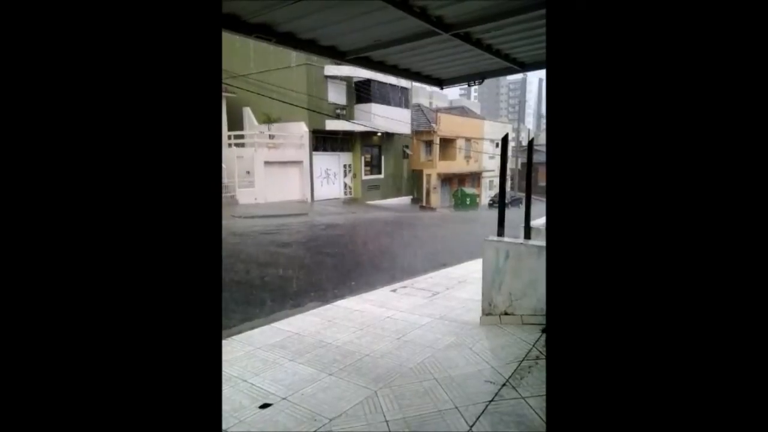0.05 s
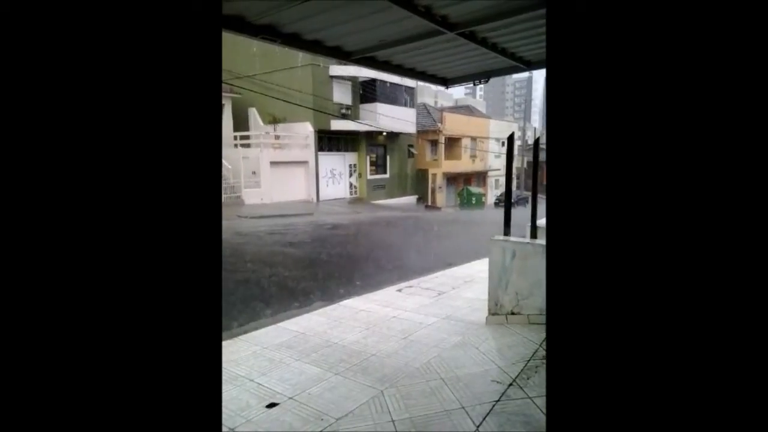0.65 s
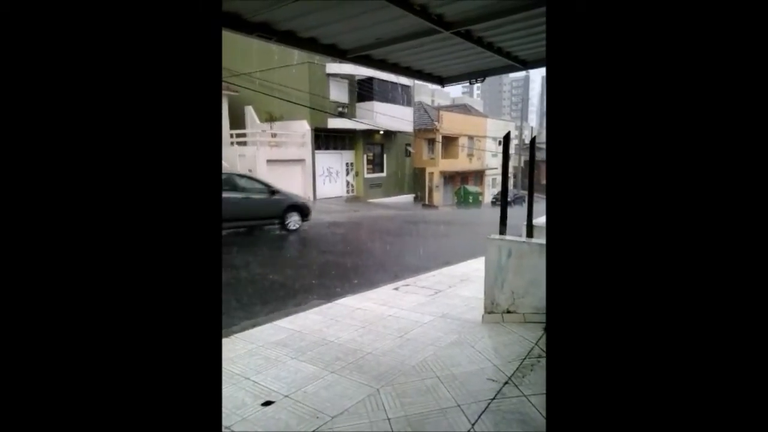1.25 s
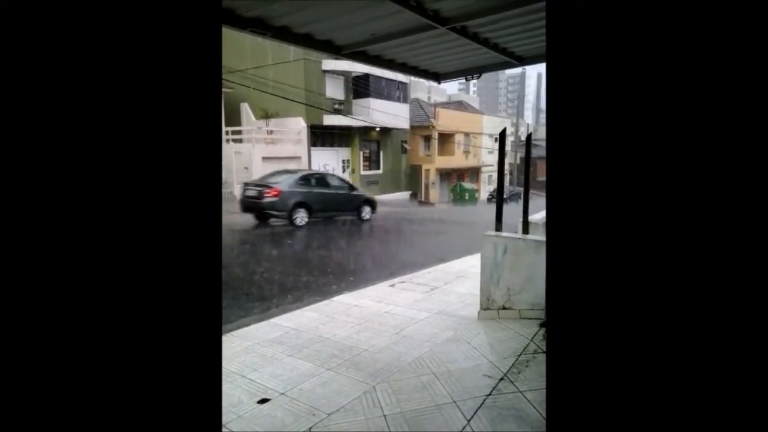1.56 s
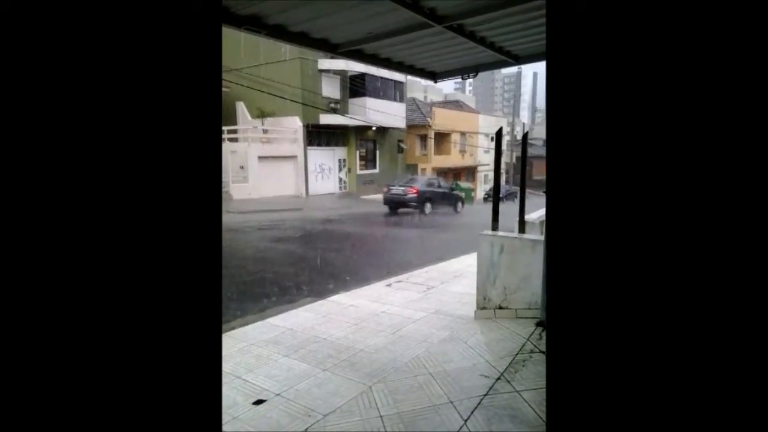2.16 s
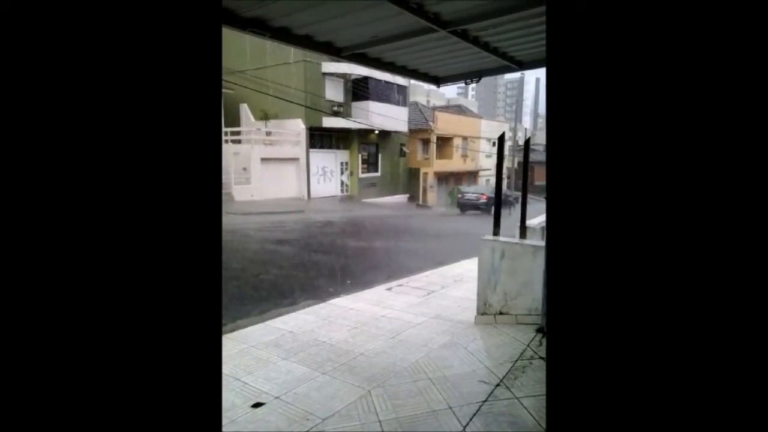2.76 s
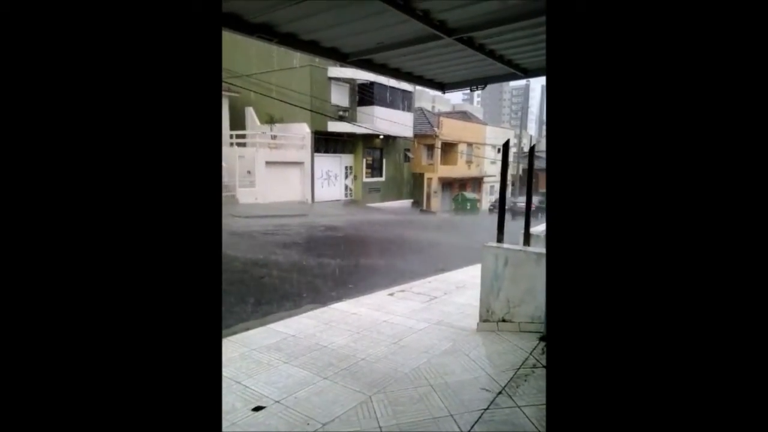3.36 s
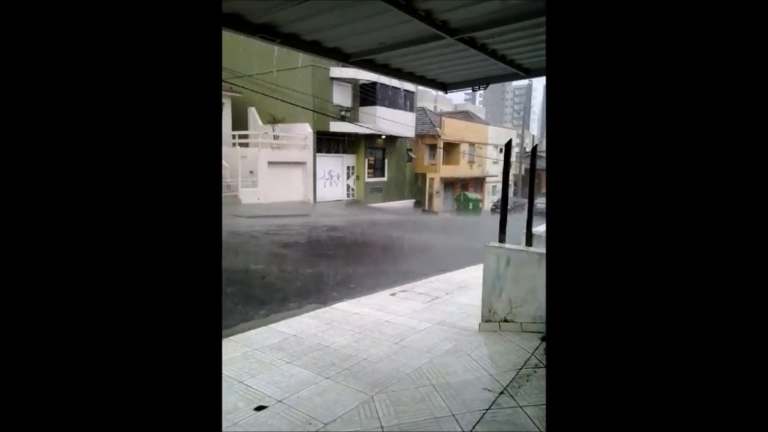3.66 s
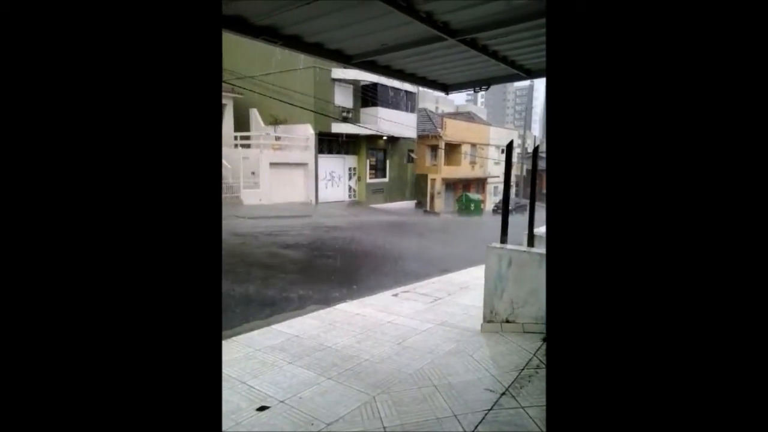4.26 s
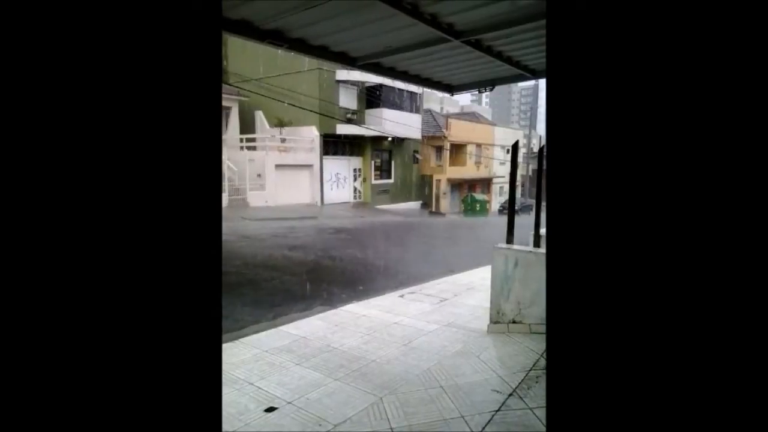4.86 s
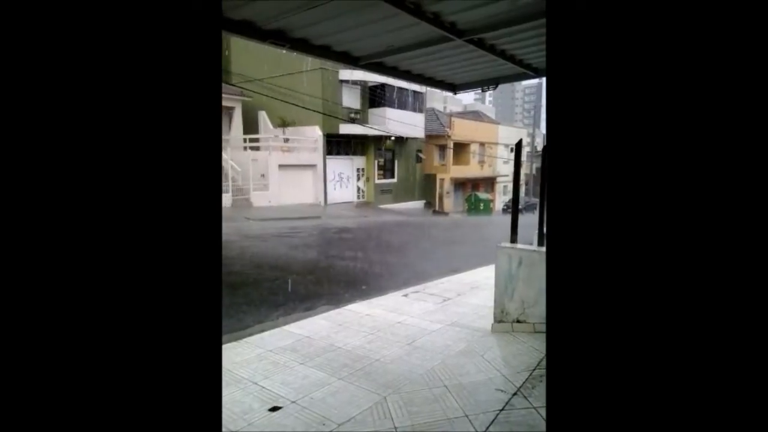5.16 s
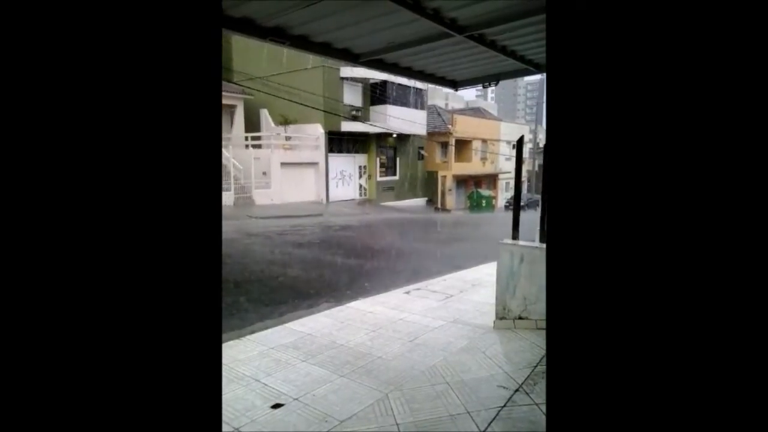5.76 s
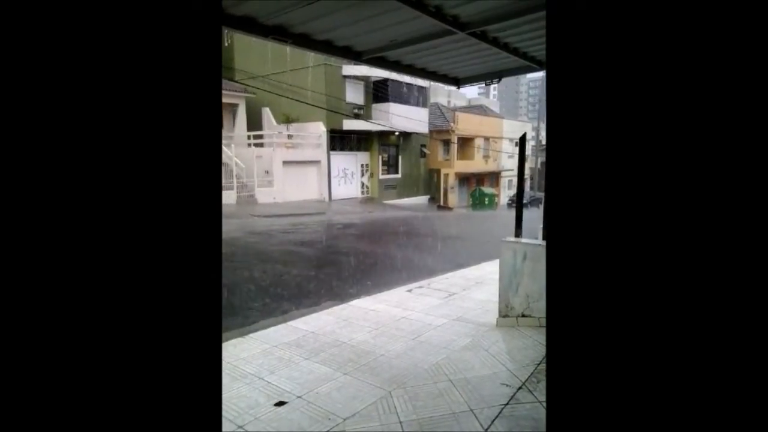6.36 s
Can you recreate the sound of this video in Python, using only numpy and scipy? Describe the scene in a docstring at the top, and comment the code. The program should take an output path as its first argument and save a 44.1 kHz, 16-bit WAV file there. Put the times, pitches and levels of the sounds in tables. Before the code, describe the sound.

Heavy rain pours on a town street for the whole six and a half seconds, heard from under a porch roof. Distant drops merge into a steady wash, nearer ones patter crisply on the pavement, and the roof drums faintly overhead. Fat drips from the eaves land a step away in sharp, irregular splats and plops, several each second.

A car is already approaching at the start and passes closest at about 1.4 seconds, its tyres hissing and swishing through the water over a soft road roar. Its low engine rumble peaks just before 2 seconds. The car recedes and is muffled after about 3 seconds, with one more distant puddle swish near 3.7 seconds.

The near rain eases very slightly but stays heavy. Three drips make tiny high plinks in a puddle at about 4.2, 4.7 and 5.9 seconds.

```python
"""Heavy rain on a street, heard in mono from under a porch roof.
From the start, far drops merge into a wash, the roof drums and nearer drops patter on the pavement,
while fat drips splat from the eaves. A car, its tyres hissing on the wet asphalt, passes at 1.35 s
and slips behind the porch wall after about three seconds. Late on, as the near rain slowly eases,
three drips trap bubbles in a puddle and ping."""
import sys
import numpy as np
from scipy import signal
from scipy.fft import rfft, irfft
from scipy.io import wavfile
from scipy.ndimage import uniform_filter1d, map_coordinates

SR = 44100
rng = np.random.default_rng(int(sys.argv[2]) if len(sys.argv) > 2 else 0)


def unload_wav(signal):
    """Save mono or channel-first audio to the path in sys.argv[1] as 16-bit WAV at rate SR, clipped to [-1, 1]."""
    wavfile.write(
        sys.argv[1],
        SR,
        np.round(np.clip(np.atleast_2d(signal).T, -1, 1) * 32767).astype(np.int16),
    )


N = 282240
TIME = np.arange(N) / SR

# lulls (negative) and flurries (positive) in the near rain: t/s, half-width/s, level change/dB
LULLS_AND_FLURRIES = [(0.45, 0.17, 2.3), (2.48, .12, 0.9), (3.18, .07, -1), (3.485, 0.024, -8.5),
                      (3.548, .04, 4), (4.075, 0.03, -5), (4.85, 0.22, -1.6), (5.5, 0.084, 2),
                      (5.67, 0.037, -4), (5.753, .04, 2), (6.181, 0.03, -2.5), (6.286, 0.076, 2)]
# tone of the far rain and town: f/Hz, level/dB
WASH_EQ = [(25, -36), (55, -30), (80, -45), (115, -19.5), (200, -14), (450, -7), (900, -7.5), (1600, -5),
           (2500, 1.5), (3700, -7.5), (8150, -5), (9600, -15), (12300, -10.5), (15800, -17.5)]
# low modes of the roof sheets: f/Hz, bandwidth/Hz, level/dB
ROOF_MODES = [(108, 7.6, -8), (135, 8, -27), (154.7, 8.7, 1.5), (197, 10, -17), (210.3, 12, 2),
              (245, 19, 3), (593, 22, 3)]
# bright tone of nearby drops, with ringing peaks near 8 and 12 kHz: f/Hz, level/dB
NEAR_DROP_EQ = [(60, -42), (1200, -13.5), (1900, -6), (2550, -4), (3400, 1.5), (4600, 0.5), (5900, 2),
                (6900, -1.5), (8150, 5), (9300, -7), (10900, -10), (12300, -1.5), (13600, -7), (15800, -18)]
# tone of churned water: f/Hz, level/dB
WATER_EQ = [(100, -50.5), (900, -33), (1500, -13), (1950, -6.5), (2300, -1.5), (2600, -0.5), (3100, -6.5),
            (3800, -13.5), (6000, -22.5), (12000, -64)]
# tone of tread on asphalt: f/Hz, level/dB
TREAD_EQ = [(50, -56), (150, -25), (400, -9.5), (560, -3), (750, -3.5), (1000, -0.5), (1500, -0.5),
            (2200, -6.5), (4000, -27.5)]
# tone of the engine through the car body: f/Hz, level/dB
ENGINE_EQ = [(40, -50), (100, -13), (180, -14.5), (250, 2.5), (310, 3), (390, -8), (800, -23.5)]
# puddles that swish under the tyres: t/s, half-width/s, boost/dB, pitch dip/fraction
PUDDLE_SWISHES = [(0.72, .16, 0, -.04), (1.218, .06, 1, .065), (2.099, .1, 1.5, 0.029), (2.3, .1, 3, 0),
                  (2.72, 0.14, 1.9, 0), (3.02, .11, 3, -.02), (3.65, .14, 6.5, -.03),
                  (4.25, .25, 2, 0.00074)]
# fat drips from the eaves: t/s, level/dB, slap f/Hz, plop level/dB, spray offset/dB
EAVES_DRIPS = [(0.069, -9, 3400, -3, -5), (0.123, -14, 4500, -3, -9), (0.3192, 1, 6440, -14, -3),
               (0.3586, -5, 8030, -25, -11), (0.4533, -1, 3720, -17, -2), (0.5453, -3, 6010, -9, -13),
               (0.5755, -12, 4510, -2, -9), (0.7891, -1, 7290, -12, -5), (0.9303, -3, 5230, -9, 1),
               (1.5032, -1, 4170, -13, -12), (1.5623, -0.5, 4280, -18, -3), (1.7574, -1, 8150, -17, -3),
               (1.7974, -5, 5490, -9, 1), (1.8756, -4, 3980, -17, -15), (2.237, -7, 5000, -6, 2),
               (2.5316, 1, 7160, -15, -14), (2.9373, -4, 6320, -17, -6), (3.0126, 0, 4200, 1.5, 2),
               (3.1789, -2, 8100, -14, -13), (3.265, -2, 3900, 0.5, 0), (3.3095, -2.5, 6000, -17, -12),
               (3.4495, 0.5, 5500, -22, -14), (3.624, -3, 7870, -15, 0.5), (3.6677, -6, 5230, -3, -9),
               (3.9289, 1, 5790, -5.5, -9), (3.9349, 0, 4670, -18, -14), (3.9809, -4, 3630, -20, -1),
               (3.986, -2.5, 5250, -17, -1), (4.13, -11, 5500, -8, 3), (4.1913, 0, 6650, -12, -0.5),
               (4.2283, -2, 6080, -12, -16), (4.4076, -6.5, 7900, -10, 3), (4.5284, -0.5, 3910, -9, -3),
               (4.573, -4, 3620, -14, -10), (4.6084, -5.5, 7950, -9, -3), (4.6736, -1, 6070, -5, -7),
               (4.752, -7, 4650, -3, 0), (4.8318, -5, 5440, -5, -3), (5.033, 0, 8170, -18, -12),
               (5.054, -1, 6470, -22, -9), (5.1672, -2.5, 6050, -24, -7), (5.313, -3, 4850, -16, 1),
               (5.4543, -1, 4660, -14, 1), (5.4859, 1, 8010, -19, -12), (5.9443, 0.5, 7000, -21, -0.5),
               (6.038, -14, 7780, -2.5, -9), (6.0969, 0.5, 5290, -9, -9), (6.244, -14, 6120, -1.5, -9),
               (6.293, 2, 8330, -24, -11), (6.3719, -1.5, 6000, -14, -2)]
# small hard drops close by: t/s, level/dB
HARD_DROPS = [(0.62, -5), (1.0126, -8), (1.3663, 0), (1.7569, -5), (1.8093, -7), (1.8262, -2), (2.1221, -2),
              (2.3734, -5), (2.547, -2), (4.13, -8), (4.2283, -5), (4.412, -7), (4.7336, -6), (5.2046, -6),
              (5.716, -3), (6.29, -7)]
# soft low rumbles: t/s, half-width/s, level/dB
LOW_SWELLS = [(1.25, 0.27, -53), (5.8, .15, -53.5)]
# drips that trap a bubble in a puddle: t/s, level/dB, starting f/Hz
BUBBLES = [(4.2105, -8, 6500), (4.675, -8, 6050), (5.9475, -6, 5850)]


def undb(db):
    """Decibels to gain."""
    return 10 ** (np.asarray(db) / 20)


def unit(x):
    """Scale to rms 1."""
    return x / np.sqrt(np.mean(x ** 2))


def colour(x, points, size=4096):
    """Minimum-phase EQ through (f/Hz, level/dB) points, so clicks keep their sharp attack."""
    hz, db = np.transpose(points)
    bins = np.maximum(np.arange(size // 2 + 1) * SR / size, 1)
    curve_db = np.interp(np.log(bins), np.log(hz), db)
    cepstrum = irfft(np.log(undb(curve_db)))
    cepstrum[1:size // 2] *= 2
    cepstrum[size // 2 + 1:] = 0
    return signal.fftconvolve(x, irfft(np.exp(rfft(cepstrum))))[:len(x)]


def walk(rate):
    """Smooth random modulation of rms 1, with `rate` new values a second."""
    hold = int(SR / rate)
    steps = np.repeat(rng.standard_normal(N // hold + 1), hold)
    return unit(uniform_filter1d(uniform_filter1d(steps, hold), hold)[:N])


def bump(s, half_width_s):
    """A bell-shaped envelope of height 1 around time s."""
    return np.exp(-((TIME - s) / half_width_s) ** 2)


def add(out, s, sound):
    """Mix a sound in at time s."""
    i = int(np.clip(s * SR, 0, N - 1))
    out[i:i + len(sound)] += sound[:N - i]


def impacts(rate, spread_db):
    """Random clicks, about `rate` a second; drop size and distance scatter their strength."""
    chance, size = rng.random(N), np.clip(rng.standard_normal(N), -2, 2)
    return (chance < rate / SR) * undb(spread_db * size) * rng.choice([-1, 1], N)


def splat(hz, spray_db, cycles, spray_s, droplet_db, flatten_s=0.0015):
    """One drop in two layers: a short slap as it flattens, and a dying tail of thrown droplets."""
    t = np.arange(SR // 25) / SR - flatten_s
    slap = np.exp(-(t * hz / cycles) ** 2) * np.sin(2 * np.pi * (hz * t + rng.random()))
    grain, size = rng.standard_normal((2, len(t)))
    crackle = unit(grain * undb(droplet_db * np.clip(size, -2, 2)))
    droplets = crackle * np.exp(-t / spray_s) * (t > 0)
    return slap, undb(spray_db) * droplets / 2


def shower(start_db=-17.5, ease_db_per_s=0.33, waver_db=-0.45):
    """The near rain's fader in dB: a slow easing, a slight waver, brief lulls and flurries."""
    changes_db = sum(db * bump(s, width) for s, width, db in LULLS_AND_FLURRIES)
    return start_db - ease_db_per_s * TIME + waver_db * walk(rate=6) + changes_db


def wash(shower_db, level_db=-20, follow=0.25):
    """Countless far drops merge into a smooth bed that partly follows the shower."""
    bed = unit(colour(rng.standard_normal(N), WASH_EQ))
    return bed * undb(level_db + follow * (shower_db - shower_db.mean()))


def roof(level_db=-43):
    """Rain keeps the low modes of the roof sheets ringing."""
    blows = impacts(rate=900, spread_db=3)
    ring = sum(undb(db) * signal.lfilter(*signal.iirpeak(hz, hz / width, fs=SR), blows)
               for hz, width, db in ROOF_MODES)
    return unit(ring) * undb(level_db)


def patter(trim_db=-4, flurry_db=2):
    """Small drops tick on the pavement in quick flurries."""
    drops = colour(impacts(rate=2000, spread_db=3), NEAR_DROP_EQ)
    return unit(drops) * undb(trim_db + flurry_db * walk(rate=45))


def splashes(count=800, trim_db=-8, spread_db=3.5, low_hz=2200, high_hz=13500):
    """Larger drops burst nearby, each at its own pitch."""
    out = np.zeros(N)
    times, pitches = rng.uniform(0, N / SR, count), rng.uniform(low_hz, high_hz, count)
    sizes = np.clip(rng.standard_normal(count), -2, 1.2)
    for s, hz, size in zip(times, pitches, sizes):
        slap, spray = splat(hz, spray_db=-9, cycles=1.3, spray_s=0.008, droplet_db=6)
        # a briefer slap packs the same energy into a higher peak
        add(out, s, undb(spread_db * size) * (slap * np.sqrt(hz / high_hz) + spray))
    return unit(colour(out, NEAR_DROP_EQ)) * undb(trim_db)


def spatter(trim_db=-14):
    """Stray drops blown under the roof click crisply on the floor."""
    return unit(colour(impacts(rate=28, spread_db=2.5), NEAR_DROP_EQ)) * undb(trim_db)


def plops(trim_db=-11.5):
    """Drops land in puddles further off with dull, uneven plops."""
    return unit(colour(impacts(rate=80, spread_db=5.5), WATER_EQ)) * undb(trim_db)


def tyre_hiss(nearness, behind, doppler, hidden, base_db=-17.5, wall_db=-5, flutter_db=0.8):
    """Tyres tear through the water film in a gritty hiss and swish through each puddle."""
    puddle_db = sum(db * bump(s, width) for s, width, db, _ in PUDDLE_SWISHES)
    pitch_dip = sum(dip * bump(s, width) for s, width, _, dip in PUDDLE_SWISHES)
    grit = unit(colour(impacts(rate=5000, spread_db=3), WATER_EQ))
    # varispeed slides the tone: lower with the car abreast, higher when it is far
    speed = doppler * (0.97 + 0.05 * np.abs(behind) - pitch_dip)
    hiss = map_coordinates(grit, [np.cumsum(speed)], order=3, mode="mirror")
    fader_db = base_db + puddle_db + wall_db * hidden + flutter_db * walk(rate=40)
    return hiss * nearness ** 0.52 * undb(fader_db)


def road_roar(nearness, behind, hidden, base_db=-26.5, rear_db=1.4, wall_db=-1.5):
    """Tread roars on the asphalt, louder behind the car than ahead of it."""
    roar = unit(colour(rng.standard_normal(N), TREAD_EQ))
    return roar * nearness ** 0.79 * undb(base_db + rear_db * behind + wall_db * hidden)


def engine(nearness, behind, passes_s, base_db=-36.5, body_db=-7, rear_db=4, beam_db=-0.3, lag_s=0.53):
    """Engine rumble; the exhaust points backwards, so it peaks after the car has passed."""
    all_round = undb(body_db + rear_db * behind) * np.sqrt(nearness)
    exhaust_beam = undb(beam_db) * bump(passes_s + lag_s, half_width_s=0.72)
    rumble = unit(colour(rng.standard_normal(N), ENGINE_EQ))
    return rumble * undb(base_db) * (all_round + exhaust_beam) * np.sqrt(nearness)


def car(speed_m_s=7, passes_s=1.35, closest_m=9, hidden_s=3.12, hiding_s=0.056):
    """A wet pass-by: house fronts slow the fade, and the porch wall ducks the hiss and roar."""
    along_m = speed_m_s * (TIME - passes_s)
    distance_m = np.hypot(along_m, closest_m)
    nearness = closest_m / distance_m
    behind = along_m / distance_m  # -1 approaching, 0 abreast, +1 leaving
    doppler = 1 / (1 + speed_m_s * behind / 343)
    hidden = (1 + np.tanh((TIME - hidden_s) / hiding_s)) / 2
    tyres = tyre_hiss(nearness, behind, doppler, hidden) + road_roar(nearness, behind, hidden)
    return tyres + engine(nearness, behind, passes_s)


def drips(slap_trim_db=-1.8, plop_trim_db=-1, fragment_trim_db=-8, plop_hz=2650, cycles=1.7):
    """Fat drips from the eaves land a step away: a bright slap, a lower plop, spray and a short slosh."""
    slaps, sprays, sloshes = np.zeros((3, N))
    for s, db, hz, plop_db, spray_db in EAVES_DRIPS:
        slap, spray = splat(hz, spray_db, cycles, spray_s=0.0053, droplet_db=0.5)
        detuned_hz = plop_hz * rng.uniform(1, 1.07)
        plop, slosh = splat(detuned_hz, spray_db=3, cycles=cycles, spray_s=0.029, droplet_db=-3)
        plop_gain = undb(plop_db + plop_trim_db)
        add(slaps, s, undb(db + slap_trim_db) * slap + plop_gain * plop)
        # the drip breaks up as it falls; fragments land just before and after, each at its own pitch
        for late, detune in rng.random((4, 2)):
            fragment_hz = np.sqrt(hz * (3000 + 6000 * detune))
            fragment, _ = splat(fragment_hz, spray_db, cycles, spray_s=0.009, droplet_db=6)
            add(slaps, s - 0.006 + 0.018 * late, undb(db + fragment_trim_db) * fragment)
        add(sprays, s, undb(db) * spray)
        add(sloshes, s, plop_gain * slosh)
    return slaps + colour(sprays, NEAR_DROP_EQ) + colour(sloshes, WATER_EQ)


def dribble(count=34, base_db=-7.5, scatter_db=3, low_hz=3500, high_hz=8400):
    """Lesser drips fall all along the eaves in a loosely even rhythm."""
    slaps, sprays = np.zeros((2, N))
    for k, (when, pitch, size) in enumerate(rng.random((count, 3))):
        hz = low_hz + (high_hz - low_hz) * pitch
        slap, spray = splat(hz, spray_db=-7, cycles=1.4, spray_s=0.008, droplet_db=-3)
        s = (k + when) / count * N / SR
        gain = undb(base_db + scatter_db * (2 * size - 0.5))
        add(slaps, s, gain * slap)
        add(sprays, s, gain * spray)
    return slaps + colour(sprays, NEAR_DROP_EQ)


def ticks(hz=12350, trim_db=-1):
    """Small hard drops strike nearby, all with the same thin, high tick."""
    out = np.zeros(N)
    for s, db in HARD_DROPS:
        slap, spray = splat(hz, spray_db=-11, cycles=3, spray_s=0.0042, droplet_db=7)
        add(out, s, undb(db + trim_db) * (slap + spray))
    return out


def low_swells(band_hz=(72, 115)):
    """The low end swells briefly in soft rumbles."""
    bandpass = signal.butter(2, band_hz, "band", fs=SR, output="sos")
    rumble = unit(signal.sosfilt(bandpass, rng.standard_normal(N)))
    return rumble * sum(undb(db) * bump(s, width) for s, width, db in LOW_SWELLS)


def pings(ring_s=0.0029, glide_per_s=3):
    """A bubble trapped by a drip rings briefly and bends up in pitch."""
    out, t = np.zeros(N), np.arange(SR // 40) / SR
    for s, db, hz in BUBBLES:
        chirp = np.sin(2 * np.pi * hz * t * (1 + glide_per_s * t / 2))
        add(out, s, undb(db) * np.exp(-t / ring_s) * chirp)
    return out


def scene():
    """Rain beds, close drops and the pass-by, mixed the same into both channels."""
    shower_db = shower()
    near_rain = (patter() + splashes() + spatter() + plops()) * undb(shower_db)
    beds = wash(shower_db) + roof() + near_rain
    close_drops = drips() + dribble() + pings() + ticks()
    mono = beds + close_drops + car() + low_swells()
    return np.array([mono, mono])


def record(dry, low_cut_hz=65, high_cut_hz=15800):
    """A phone's tone: deep bass thinned, the loudest drips clipped, the very top cut."""
    low_cut = signal.butter(3, low_cut_hz, "high", fs=SR, output="sos")
    high_cut = signal.ellip(10, 0.05, 60, high_cut_hz, fs=SR, output="sos")
    clipped = np.clip(signal.sosfilt(low_cut, dry), -1, 1)
    return signal.sosfiltfilt(high_cut, clipped)


dry = scene()
out = record(dry)
unload_wav(out)
```